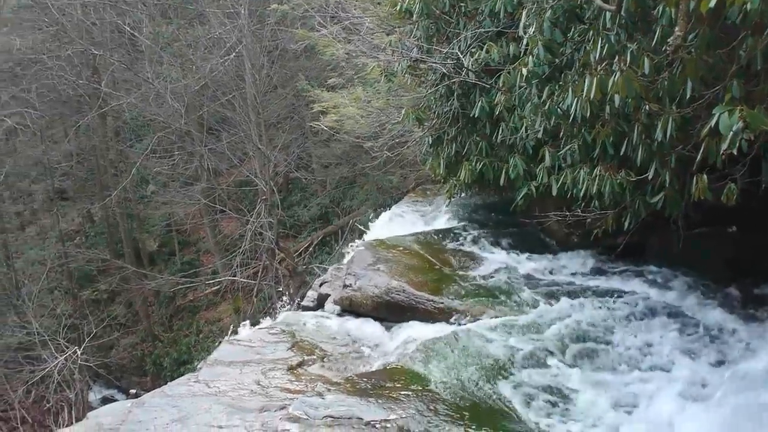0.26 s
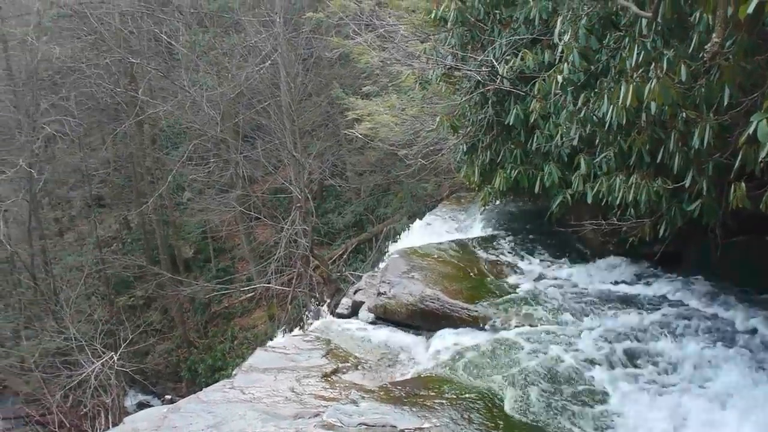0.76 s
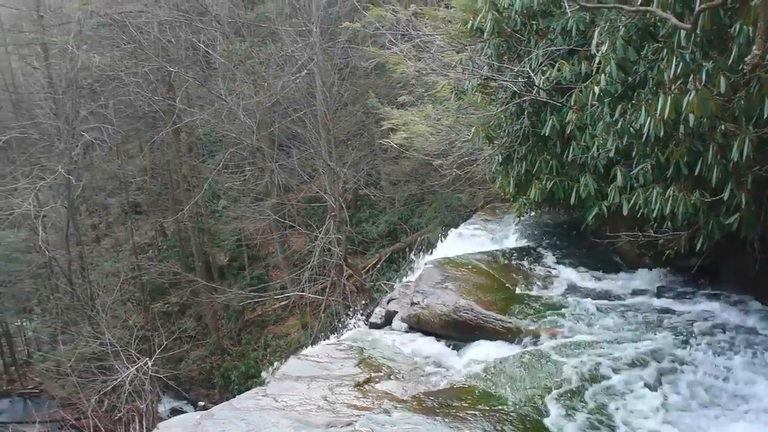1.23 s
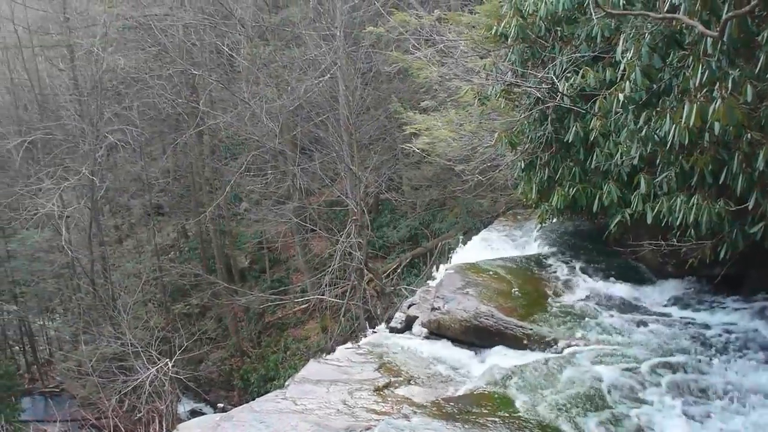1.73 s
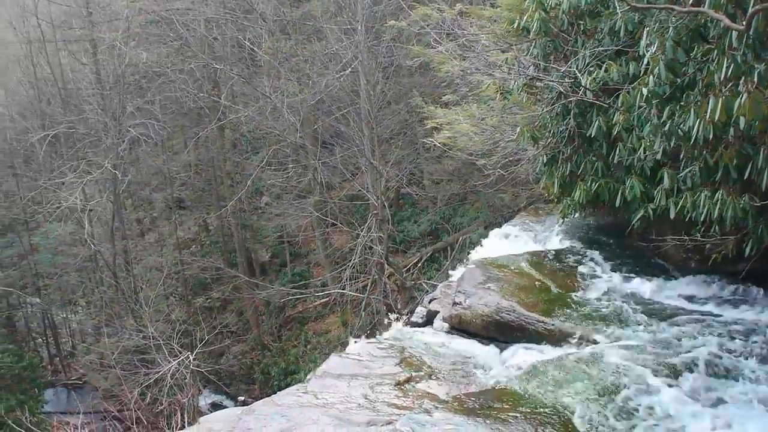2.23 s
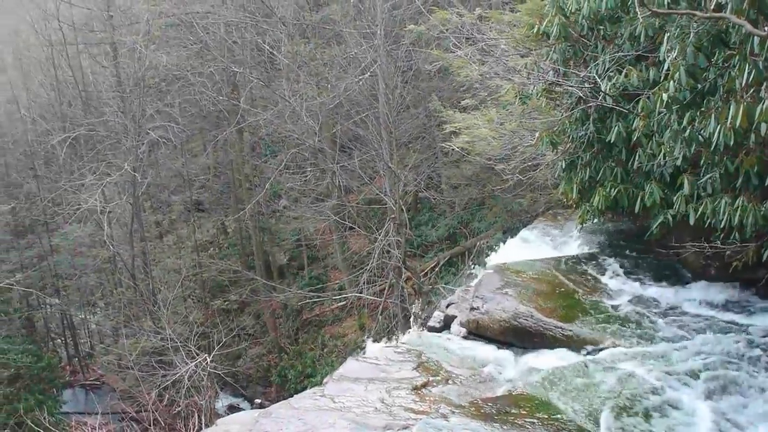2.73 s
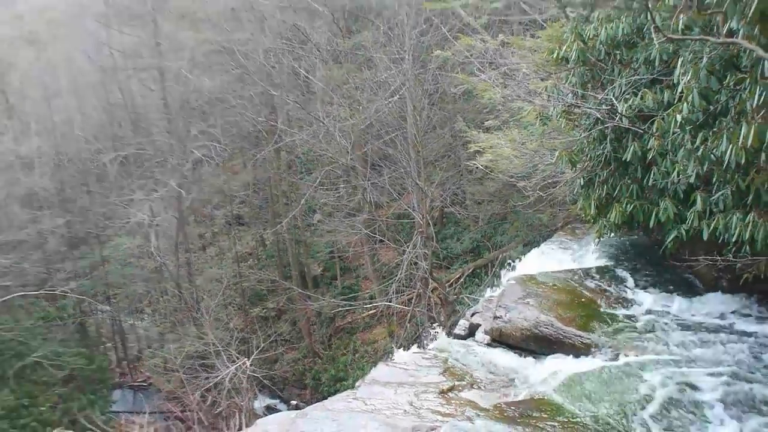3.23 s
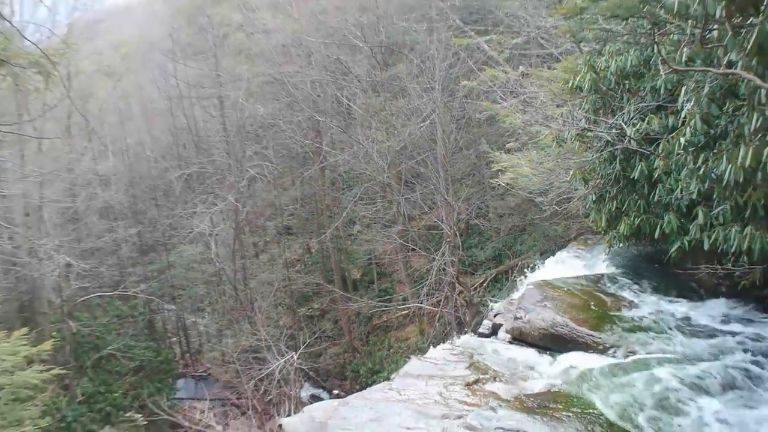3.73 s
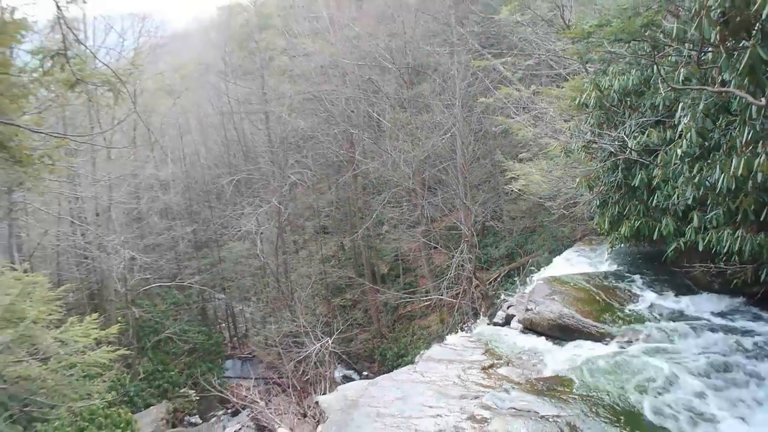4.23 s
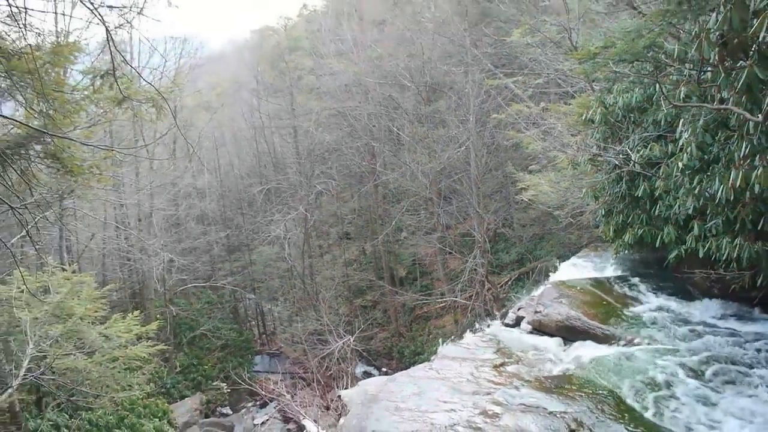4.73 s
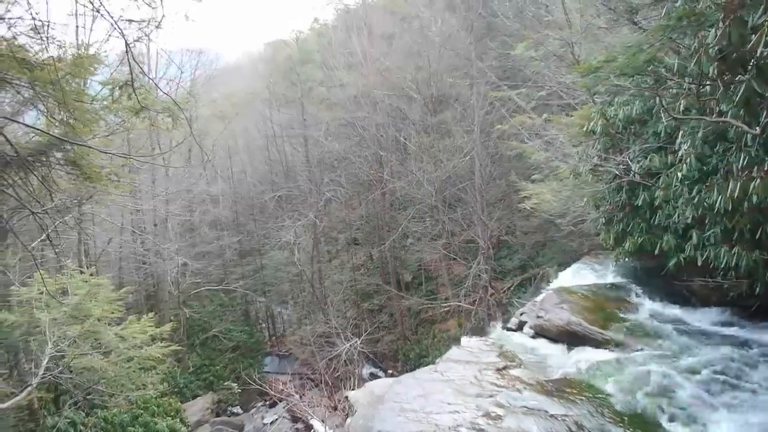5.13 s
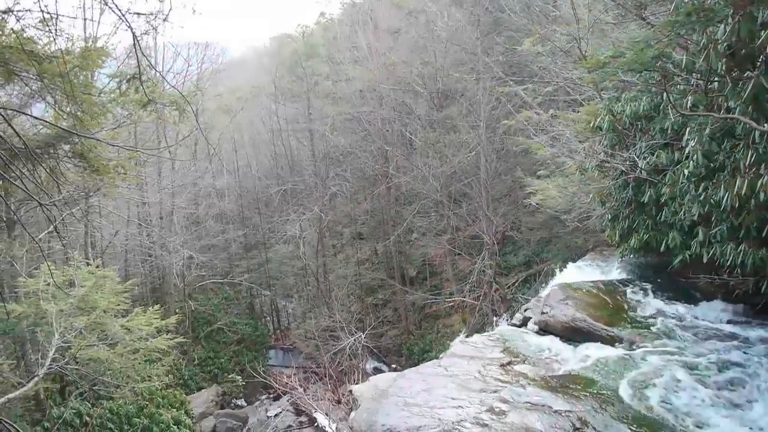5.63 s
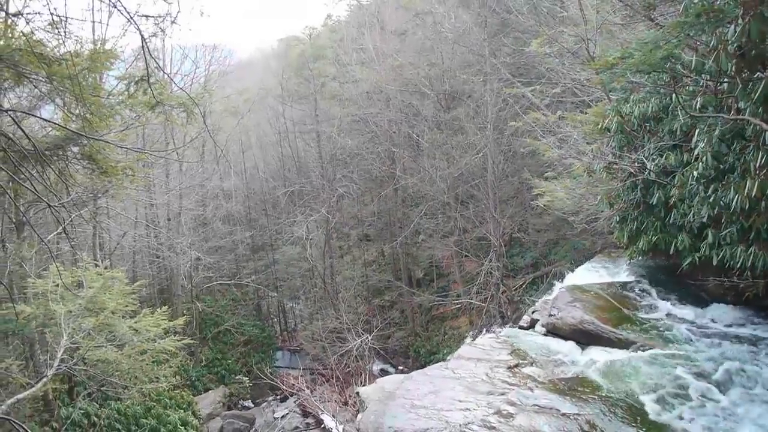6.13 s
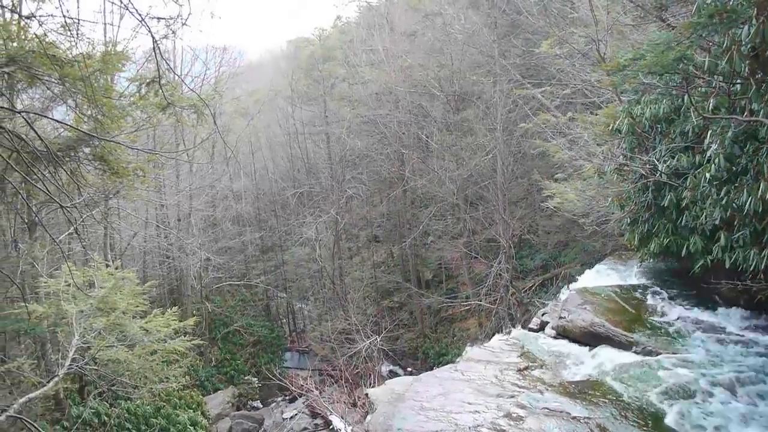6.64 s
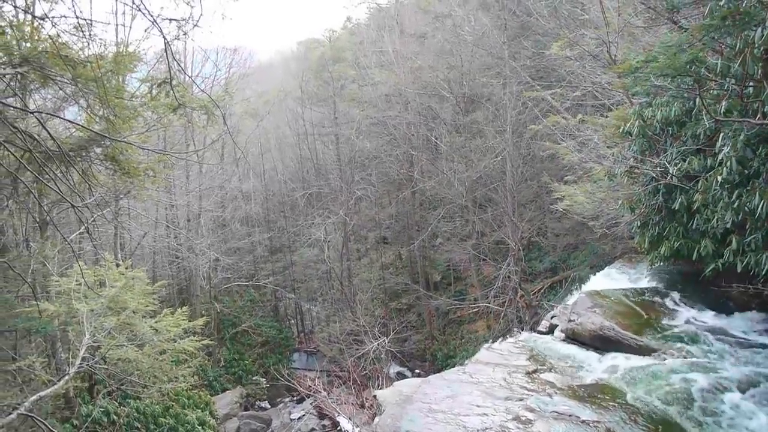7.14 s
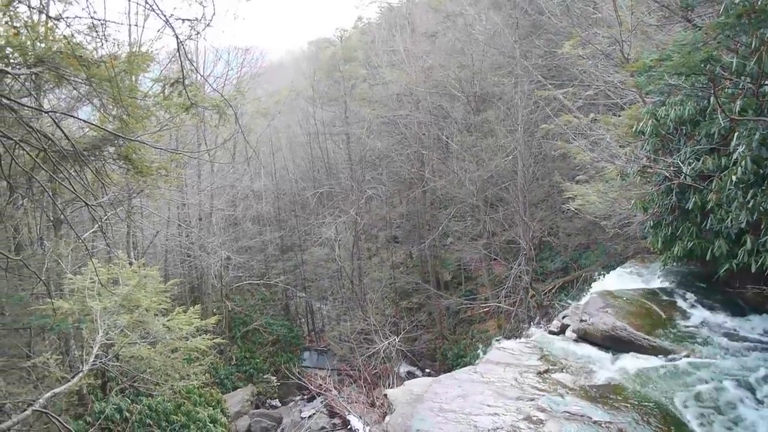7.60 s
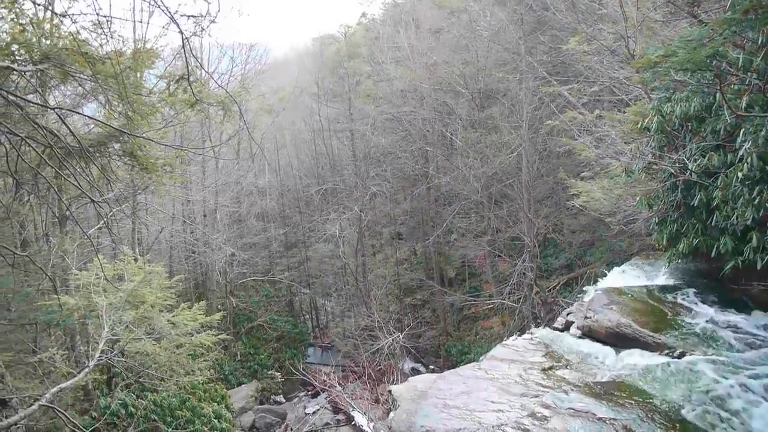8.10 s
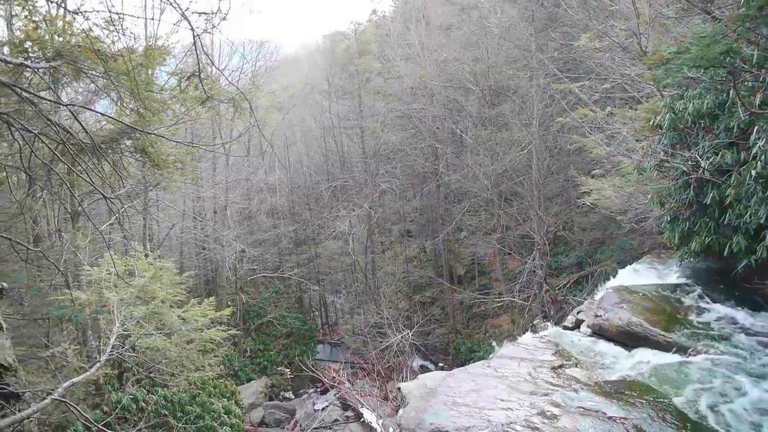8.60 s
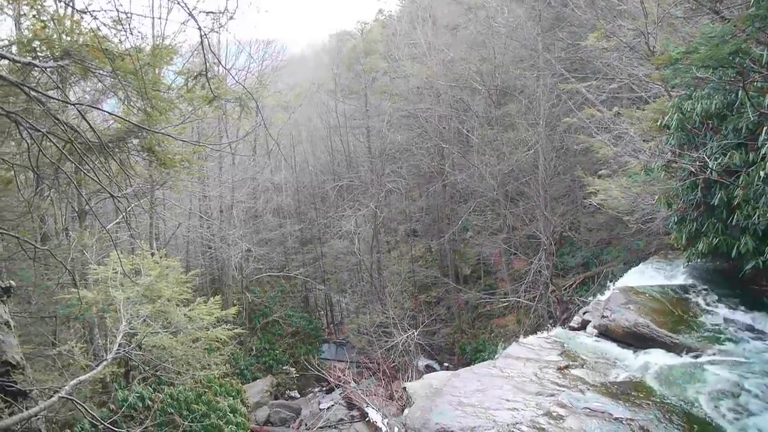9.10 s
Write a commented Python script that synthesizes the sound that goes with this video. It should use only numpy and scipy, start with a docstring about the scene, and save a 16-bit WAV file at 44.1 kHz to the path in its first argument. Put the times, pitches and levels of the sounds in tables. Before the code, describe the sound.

A steady, loud rush of stream water tumbling over rock ledges outdoors in a wooded gorge. A low-mid roar full of gulps and gurgles comes from the plunge pool, while hissing, bubbling white water breaks on rock above it. Small slaps and plunging thumps poke out irregularly. The stereo microphone is close and turns left, so the spray drifts right; the rush eases slightly at the end.

```python
"""A mountain stream tumbles over rock ledges in a wooded gorge, a stereo microphone close to the water.
The plunge pool roars, gulps and gurgles: coloured noise with the ringing tones of trapped air pockets.
White water, of noise, small bubble tones and drop crackle, breaks on the ledges; splashes and showers join it.
The microphone turns steadily left until 5.4 s, which moves the white water to the right.
The whole rush gets a little quieter in the last half second."""
import sys
import numpy as np
from scipy import signal
from scipy.fft import rfft, irfft, next_fast_len
from scipy.io import wavfile
from scipy.ndimage import uniform_filter1d, map_coordinates

SR = 44100
rng = np.random.default_rng(int(sys.argv[2]) if len(sys.argv) > 2 else 0)


def wrap_up_sound(samples):
    """Save the sound to the file named by the first command line argument, as 16-bit audio."""
    columns = np.atleast_2d(samples).T
    # keep every value between -1 and 1, then stretch to whole-number steps
    tamed = np.clip(columns, -1, 1)
    steps = np.round(tamed * 32767).astype(np.int16)
    wavfile.write(sys.argv[1], SR, steps)


N = 412776


def amp(db):
    """Decibels to gain."""
    return 10 ** (np.asarray(db) / 20)


def unit(x):
    """x at rms 1."""
    return x / np.sqrt(np.mean(x ** 2) + 1e-20)


def along(points, hz):
    """(freq_hz, value) points, read on a log frequency axis."""
    f, value = np.transpose(points)
    return np.interp(np.log(hz + 1), np.log(f + 1), value)


def wobble(rate):
    """A smooth random curve through rate random knots a second."""
    knots = rng.standard_normal(int(N * rate / SR) + 4)
    return map_coordinates(knots, [np.arange(N) * rate / SR])


def filtered(x, response):
    """x times a complex response of frequency."""
    m = next_fast_len(N + SR // 2)
    return irfft(rfft(x, m) * response(np.fft.rfftfreq(m, 1 / SR)), m)[..., :N]


def churn(patchy_db, size):
    """Two unrelated noises that swell in shared time-frequency patches, size = (bins, frames)."""
    z = signal.stft(rng.standard_normal((2, N)), nperseg=512)[2]
    field = rng.standard_normal(z.shape[1:])
    field = uniform_filter1d(field, size[0], 0)
    field = uniform_filter1d(field, size[1], 1)
    patchy = z * amp(patchy_db * unit(field))
    return unit(signal.istft(patchy, nperseg=512)[1][:, :N])


def bubbles(count, low_hz, high_hz, cycles, scatter_db, rise, size):
    """A swarm of damped bubble tones, size samples each; the pitch rises as a bubble nears the surface."""
    when, pitch, strength, phase = rng.random((count, 4)).T[:, :, None]
    hz = low_hz * (high_hz / low_hz) ** pitch
    t = np.arange(size) / SR
    age = hz * t / cycles
    # many weak bubbles, few strong ones
    gain = amp(-scatter_db * np.log(1 - .99 * strength))
    envelope = gain * np.exp(-np.pi * age) * (1 - np.exp(-20 * age))
    turns = hz * t * (1 + rise * np.minimum(age, 2) / 2) + phase
    tones = envelope * np.sin(2 * np.pi * turns)
    where = (when * N).astype(int) + np.arange(size)
    return unit(np.bincount(where.ravel(), tones.ravel(), N)[:N])


# how alike the water sounds at the two microphone ports: freq_hz, likeness (0-1)
LIKENESS = [(200, .998), (500, .988), (820, .96), (1250, .64), (1750, .73), (2700, .3), (3900, .57),
            (6000, .04), (7800, .7)]
# phase by which the left port leads: freq_hz, lead_rad
LEFT_LEAD = [(0, 0), (1120, 0.5), (1460, 1.19), (1980, 1.33), (3190, 2.5), (3790, 3), (5340, 0.73),
             (7240, 0.05), (7920, 0.5)]
# balance, the lows slightly left and the highs right: freq_hz, left_minus_right_db
SIDES = [(60, 2.5), (110, 2), (200, 1.5), (370, 1.0), (680, 0.5), (1250, -3), (2300, -4.0), (4220, -4),
         (7740, -2.5)]


def at_ports(pair, colour_db):
    """Direct and scattered sound, coloured, as the two microphone ports hear them; rms 1."""
    def spread(hz):
        # more scattered sound makes the two ports less alike
        u = np.arccos(np.clip(along(LIKENESS, hz), 0, 1)) / 2
        return amp(colour_db(hz)) * np.array([np.cos(u), np.sin(u)])

    def shade(hz):
        lead_rad = np.interp(hz, *np.transpose(LEFT_LEAD))
        half = amp(along(SIDES, hz) / 2) * np.exp(.5j * lead_rad)
        return np.array([half, 1 / half]) / np.hypot(abs(half), 1 / abs(half))

    direct, scattered = filtered(pair, spread)
    return unit(filtered(np.array([direct + scattered, direct - scattered]), shade))


# relative spectrum of the plunge pool: freq_hz, density_db
POOL = [(25, -53), (55, -49.5), (105, -24), (140, -22), (170, -13), (205, -6.5), (260, -3.5), (345, -4),
        (420, -3), (600, -0.2), (880, -2.36), (1020, -8), (1400, -23), (3000, -59.5)]
# hollows under the ledge that the water booms in: centre_hz, width_hz, lift_db
HOLLOWS = [(279.5, 31, 6), (340, 36, 5), (480, 28, 1.8), (600, 30, 0.8)]


def pool_colour(hz):
    """The roar's spectrum in dB, lifted at the resonance of each rock hollow."""
    booms = sum(db / (1 + (2 * (hz - centre) / width) ** 2) for centre, width, db in HOLLOWS)
    return along(POOL, hz) + booms


# brief lulls in the roar: middle_s, depth_db
LULLS = [(0.515, 0.5), (2.565, 4), (4.35, 1.8), (8.165, 2.5)]
LULL_S = 0.028  # half length (s)


def lulls():
    """Level of the roar in dB: it slackens briefly when less water falls."""
    t = np.arange(N) / SR
    return -sum(db * np.exp(-((t - s) / LULL_S) ** 2) for s, db in LULLS)


def pool(flow):
    """Falling water drives big air pockets under: a dense roar full of short gulps."""
    roar = churn(patchy_db=0.5, size=(7, 8))
    gulps = bubbles(count=1500, low_hz=297.2, high_hz=1008, cycles=9.9, scatter_db=1.0, rise=0.041, size=2000)
    # the gulps reach the microphone by the direct path only
    water = roar + amp(-20.5) * np.array([gulps, np.zeros(N)])
    surge_db = .2 * flow + 0.4 * wobble(55) + lulls()
    return amp(-20.0 + surge_db) * at_ports(water, pool_colour)


# the microphone's steady turn to the left: when it ends,
# and when it passes the heading at which the white water has its plain balance (s)
TURN_END_S, TURN_PLAIN_S = 5.4, 4.5
# each second of turning moves the white water right (dB), lets the left port lead (samples), dulls the top (dB)
PAN_DB_PER_S, LEAD_SAMPLES_PER_S, DULL_DB_PER_S = 0.3, 0.21, 0.44
# the band of the fizz: freq_hz, share (0-1)
FIZZ_BAND = [(2200, 0), (3500, 1), (5600, 1), (6600, 0)]
# change of the fizz for each second of turning: left_port_db, right_port_db
FIZZ_DB_PER_S = (-0.03, 0.12)


def turned(pair):
    """As the microphone turns, balance and arrival time shift; the fizz swings furthest, the top end dulls."""
    turn_s = np.minimum(np.arange(N) / SR, TURN_END_S) - TURN_PLAIN_S
    pan_db, lead = -PAN_DB_PER_S * turn_s, LEAD_SAMPLES_PER_S * turn_s
    top = filtered(pair, lambda hz: np.clip((hz - 5500) / 1500, 0, 1))
    fizz = filtered(pair, lambda hz: along(FIZZ_BAND, hz))
    # the top end starts bright and is plain once the turn ends
    top_gain = amp(DULL_DB_PER_S * (turn_s[-1] - turn_s))
    fizz_gain = amp(np.outer(FIZZ_DB_PER_S, turn_s))
    pair = pair + (top_gain - 1) * top + (fizz_gain - 1) * fizz
    ports = []
    for port, side in zip(pair, (.5, -.5)):
        shifted = map_coordinates(port, [np.arange(N) + side * lead], mode="nearest")
        ports.append(amp(side * pan_db) * shifted)
    return np.array(ports)


# relative spectrum of the white water on the ledges: freq_hz, density_db
SPRAY = [(150, -47), (600, -7.5), (1100, 1), (1800, 2.5), (2500, 0.3), (3100, -0.76), (3800, 1.8),
         (4300, -0.3), (5100, 0.5), (6100, -1.5), (6900, -4), (7300, -8), (7650, -15.5), (7950, -38.5)]


def white_water(flow):
    """Sheets of water break on the rock: splashing, small ringing bubbles and a fine crackle of drops."""
    hiss = churn(patchy_db=0.5, size=(30, 7))
    babble = np.array([bubbles(count=1500, low_hz=1104, high_hz=5020, cycles=22,
                               scatter_db=2.5, rise=0.074, size=1100) for _ in hiss])
    drops = np.array([bubbles(count=6000, low_hz=2550, high_hz=7540, cycles=2.8,
                              scatter_db=3.5, rise=0.066, size=90) for _ in hiss])
    mixture = hiss + amp(-22.5) * babble + amp(-15.5) * drops
    water = at_ports(mixture, lambda hz: along(SPRAY, hz))
    surge_db = 0.098 * flow + 0.25 * wobble(60)
    return amp(-19.0 + surge_db) * turned(water)


# an air pocket's life (cycles), its rise in pitch (share), and where its sound thins out below (Hz)
POCKET_CYCLES, POCKET_RISE, POCKET_LOW_HZ = 9, .04, 210


def pockets(rows):
    """Trapped air pockets (start_s, peak_db, pitch_hz) swell and ring out, their pitch rising a little."""
    start_s, db, hz = np.transpose(rows)[:, :, None]
    step = np.arange(SR // 10)
    age = step / SR * hz / POCKET_CYCLES
    ring = np.sin(2 * np.pi * POCKET_CYCLES * age * (1 + POCKET_RISE * age))
    # the envelope peaks at 1
    tones = amp(db) * ring * 2 * np.pi * age * np.exp(1 - 2 * np.pi * age)
    where = (start_s * SR).astype(int) + step
    rings = np.bincount(where.ravel(), tones.ravel(), N)[:N]
    return filtered(rings, lambda hz: 1 - np.exp(-(hz / POCKET_LOW_HZ) ** 6))


def slaps(rows, half_s, body_db, colour_db):
    """Water strikes: a brief burst of noise, and the pocket that it traps rings."""
    t = np.arange(N) / SR
    envelope = sum(amp(db + body_db) * np.exp(-((t - s) / half_s) ** 2) for s, db, hz in rows)
    rings = pockets([(s - half_s / 2, db, hz) for s, db, hz in rows])
    return rings + envelope * at_ports(rng.standard_normal((2, N)), colour_db)


# the clearest splashes on the near rock: middle_s, peak_db, pitch_hz (of the trapped air)
SPLASHES = [(0.245, -21, 1700), (1.04, -23, 1750), (1.248, -20, 2050), (1.762, -18.5, 1690),
            (2.05, -19, 1540)]
# relative spectrum of their spatter: freq_hz, density_db
SPLASH_COLOUR = [(500, -27.5), (1500, 4), (2100, 2), (3000, -9), (6000, -18), (7900, -45)]
# half length (s), and the spatter relative to the peak (dB)
SPLASH_S, SPLASH_BODY_DB = .013, -4.5


def splashes():
    """A tongue of water slaps the near rock with a light plip."""
    return slaps(SPLASHES, SPLASH_S, SPLASH_BODY_DB, lambda hz: along(SPLASH_COLOUR, hz))


# the heaviest slaps of water into the pool: middle_s, peak_db, pitch_hz (of the trapped air)
PLUNGES = [(0.291, -11.5, 587), (0.487, -14, 330), (0.648, -16.5, 296), (0.662, -19.5, 400),
           (1.88, -18, 686), (2.783, -12.5, 607), (3.368, -16, 320), (3.612, -17, 630), (5.373, -18, 320),
           (5.523, -15.5, 276), (6.745, -12.5, 597), (6.969, -14.5, 336), (8.528, -13.5, 900),
           (8.728, -12.5, 544)]
# half length (s), and the noise body relative to the peak (dB)
PLUNGE_S, PLUNGE_BODY_DB = .007, -6.5


def plunges():
    """A thick slug of water hits the pool with a brief thump and a gulp."""
    return slaps(PLUNGES, PLUNGE_S, PLUNGE_BODY_DB, pool_colour)


# the clearest gurgles in the pool: middle_s, peak_db (of each pocket), pitch_hz
GURGLES = [(2.424, -19, 342), (2.82, -18.5, 655), (3.976, -18, 302), (4.438, -18, 650), (5.198, -18, 385),
           (6.496, -17, 517), (7.08, -18, 605), (7.239, -17, 385), (7.311, -22, 265), (7.346, -16, 646),
           (7.93, -18, 620), (8.287, -20, 565)]
# length (s) and scatter of the pitches (share)
GURGLE_S, GURGLE_SPREAD = .07, .1


def gurgles(count=5):
    """A big air pocket breaks up into a quick, uneven run of smaller ones of about the same pitch."""
    chance = rng.uniform(-1, 1, (len(GURGLES), count, 2))
    rows = []
    for (s, db, hz), run in zip(GURGLES, chance):
        for k, (jitter, detune) in enumerate(run):
            start_s = s + GURGLE_S * ((k + jitter / 2) / count - .5)
            rows.append((start_s, db, hz * (1 + GURGLE_SPREAD * detune)))
    return pockets(rows)


# showers of thrown drops: middle_s, level_db, half_length_s
SHOWERS = [(5.28, -26.5, .025), (8.065, -21, .04), (8.74, -27, .035)]
# relative spectrum of their hiss: freq_hz, density_db
SHOWER_COLOUR = [(1500, -30), (2800, -9), (3900, 0.5), (4700, -2.5), (6200, -6), (7900, -34)]


def showers():
    """Thrown drops patter back onto the rock in a short hiss."""
    t = np.arange(N) / SR
    envelope = sum(amp(db) * np.exp(-((t - s) / half_s) ** 2) for s, db, half_s in SHOWERS)
    return envelope * at_ports(rng.standard_normal((2, N)), lambda hz: along(SHOWER_COLOUR, hz))


def late_drop(start_s, step_s, depth_db, sink_db_per_s):
    """Gain of a layer: steady, then a quick step down and a slow sinking."""
    since = np.maximum(np.arange(N) / SR - start_s, 0)
    return amp(-depth_db * np.minimum(since / step_s, 1) - sink_db_per_s * since)


def scene():
    """One uneven flow feeds both the ledges and the pool; the white water fades later and further than the roar."""
    flow = unit(wobble(6.7) + wobble(13))
    roar = pool(flow) + plunges() + gurgles()
    spray = white_water(flow) + splashes() + showers()
    roar_gain = late_drop(start_s=8.85, step_s=0.16, depth_db=2.5, sink_db_per_s=2.7)
    spray_gain = late_drop(start_s=8.915, step_s=.06, depth_db=2.5, sink_db_per_s=4.6)
    return roar * roar_gain + spray * spray_gain


TOP_HZ = 7980  # the microphone's band limit


def record(dry):
    """The microphone passes nothing above its band limit."""
    return filtered(dry, lambda hz: hz < TOP_HZ)


dry = scene()
out = record(dry)
wrap_up_sound(out)
```